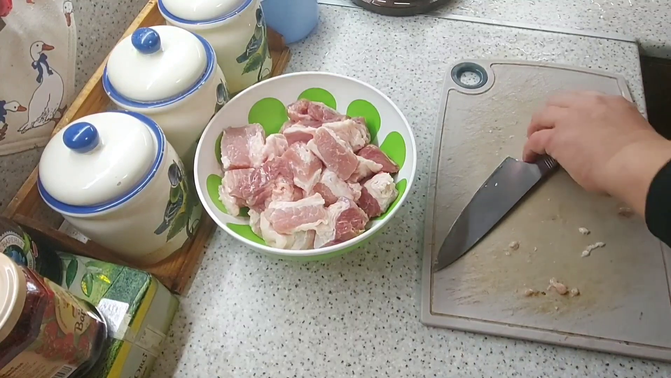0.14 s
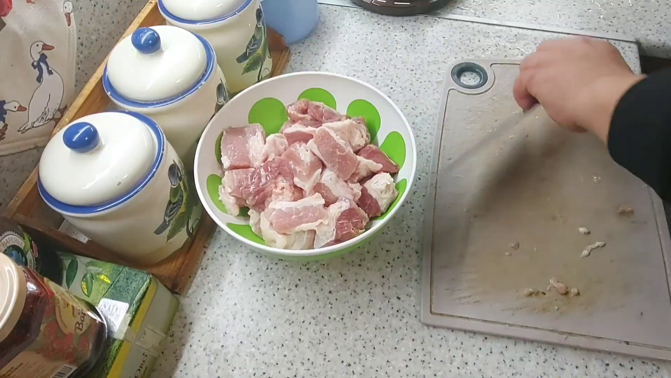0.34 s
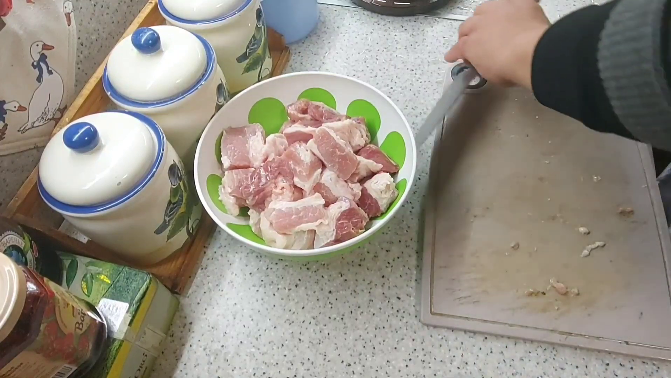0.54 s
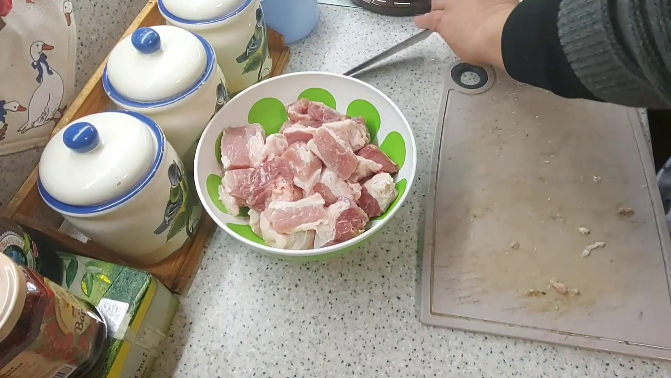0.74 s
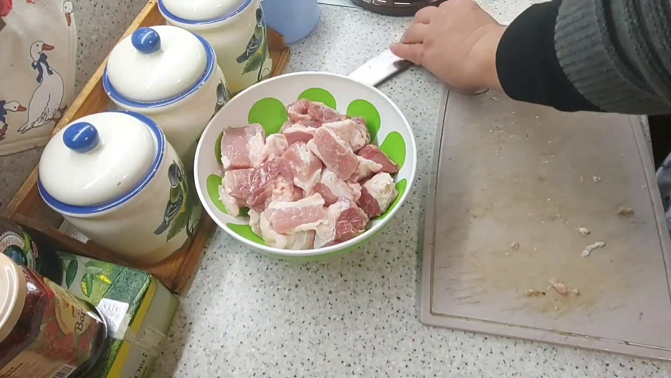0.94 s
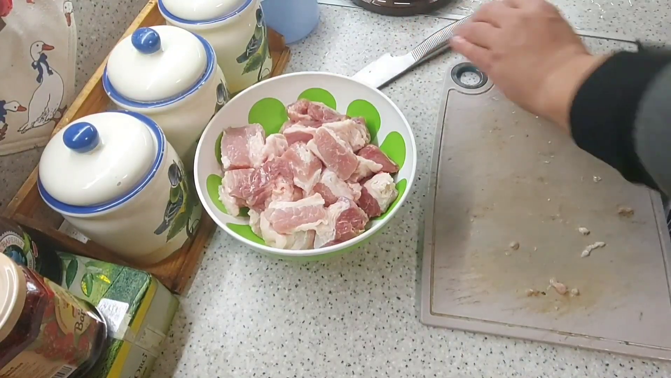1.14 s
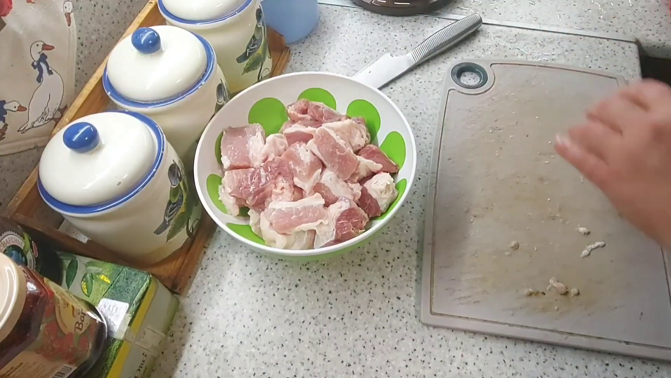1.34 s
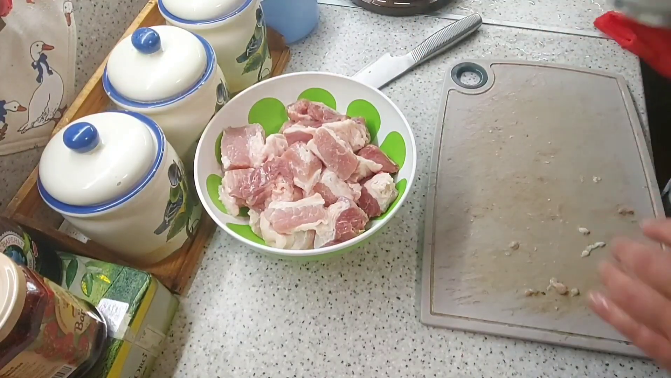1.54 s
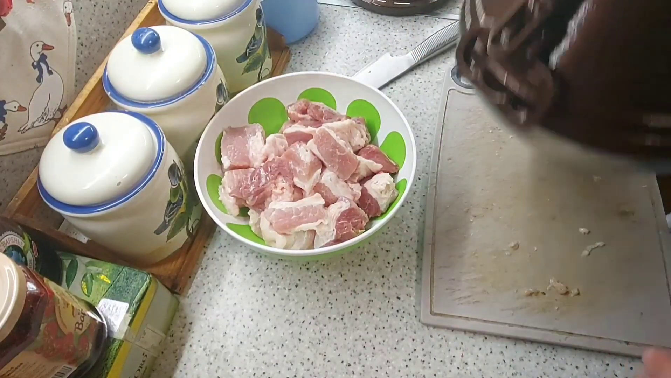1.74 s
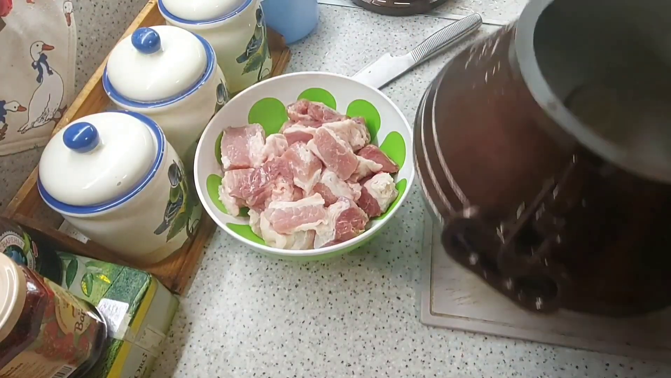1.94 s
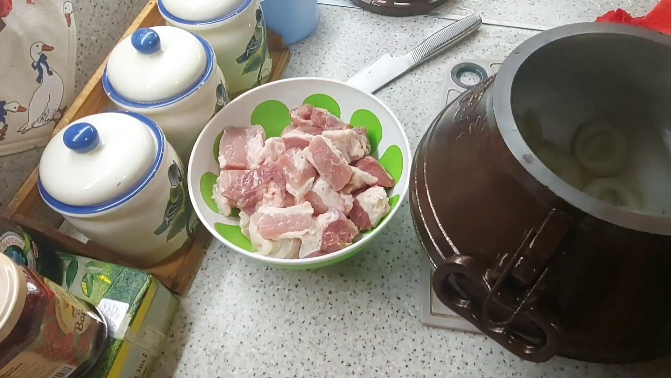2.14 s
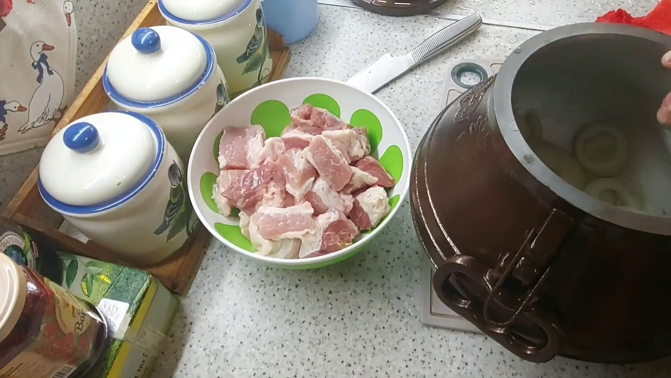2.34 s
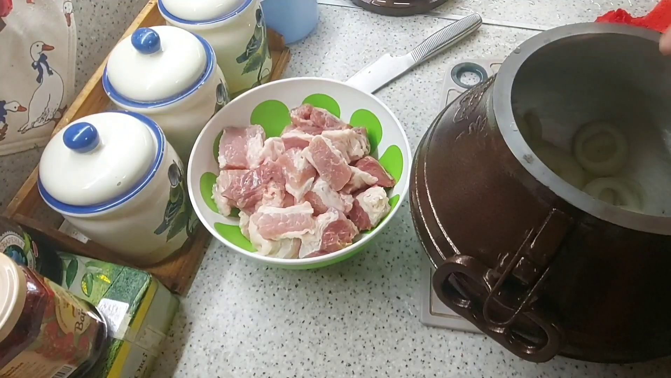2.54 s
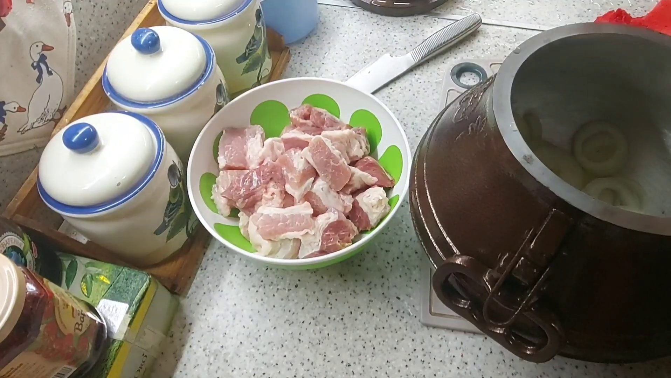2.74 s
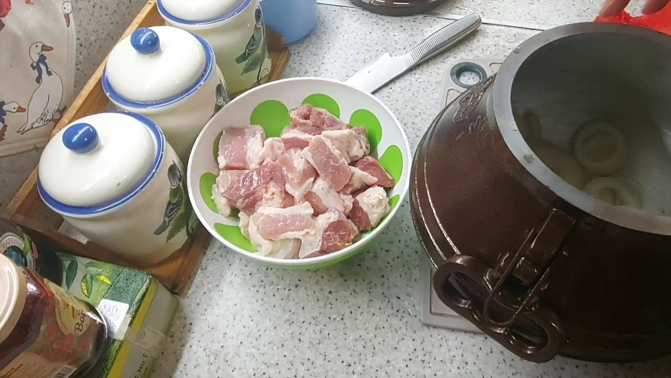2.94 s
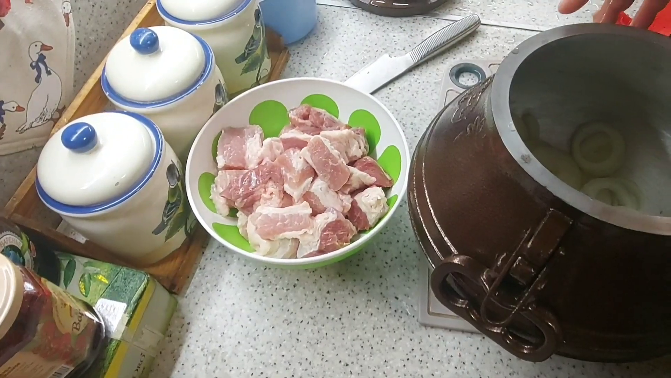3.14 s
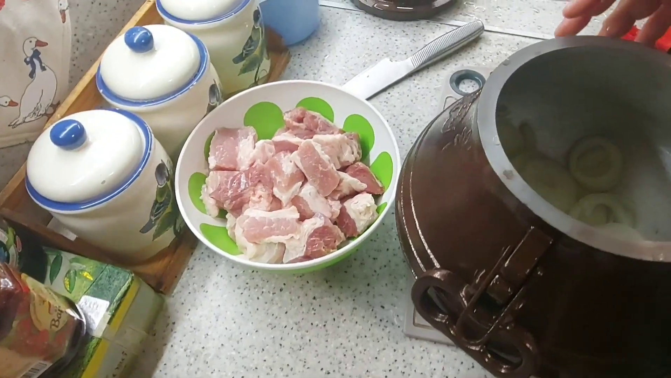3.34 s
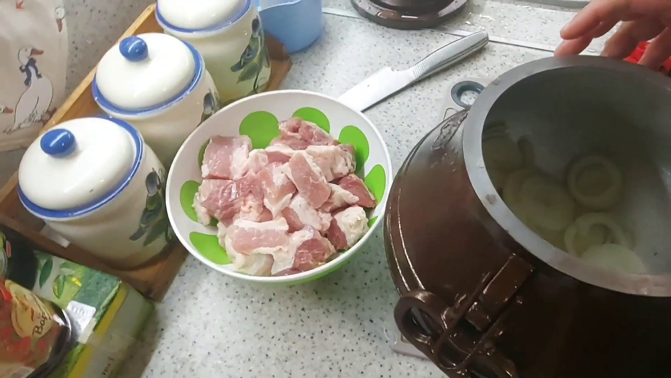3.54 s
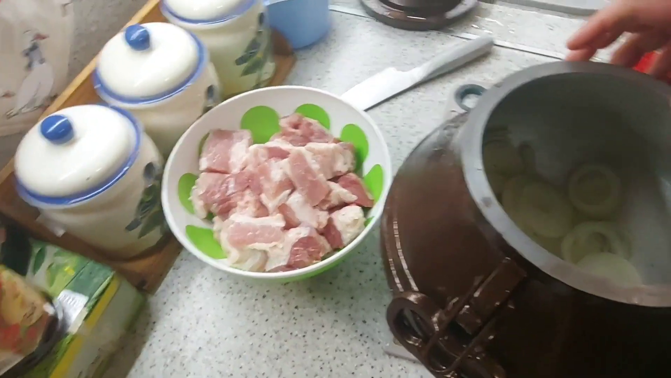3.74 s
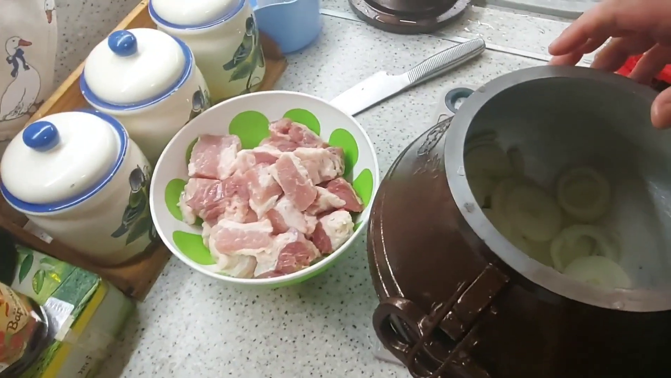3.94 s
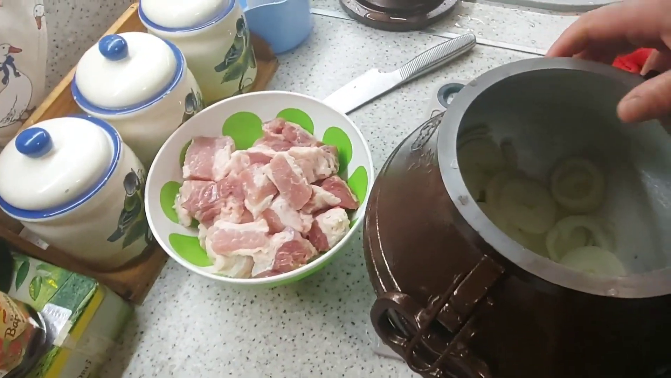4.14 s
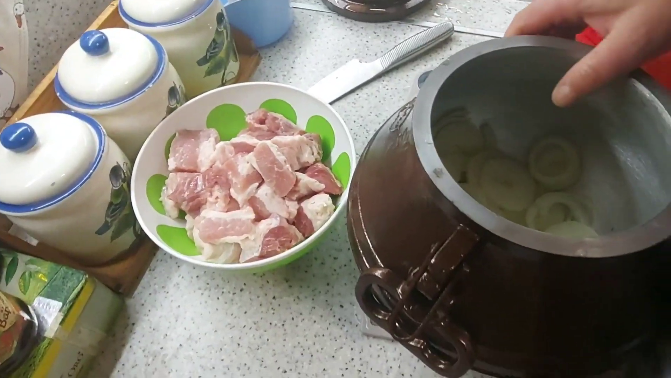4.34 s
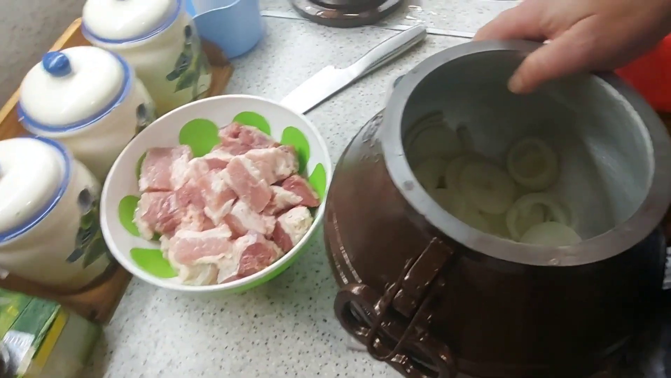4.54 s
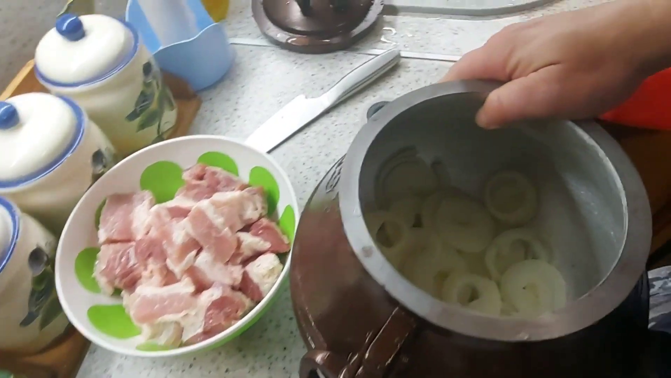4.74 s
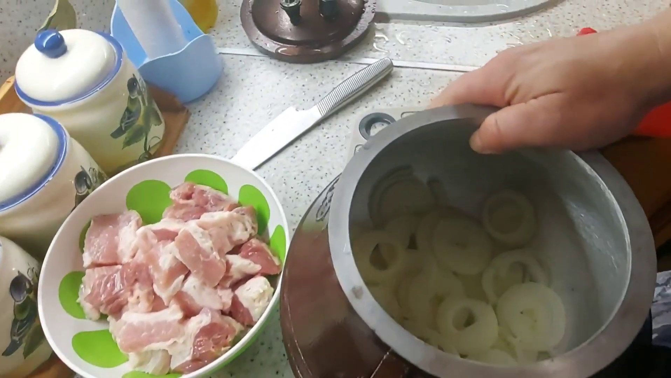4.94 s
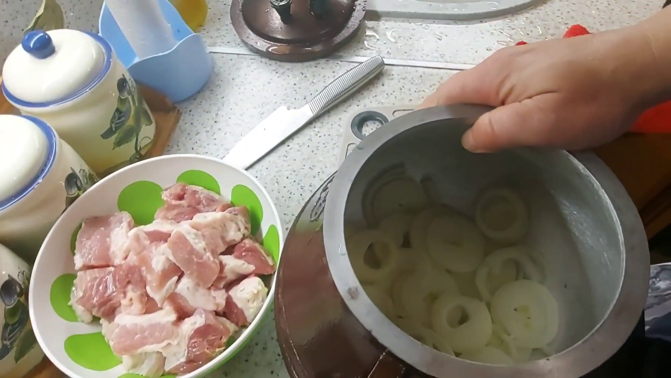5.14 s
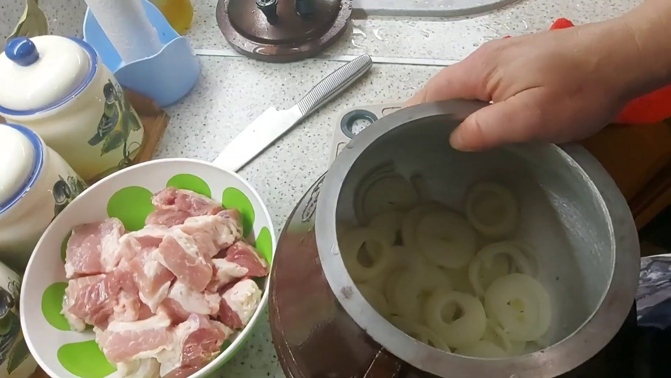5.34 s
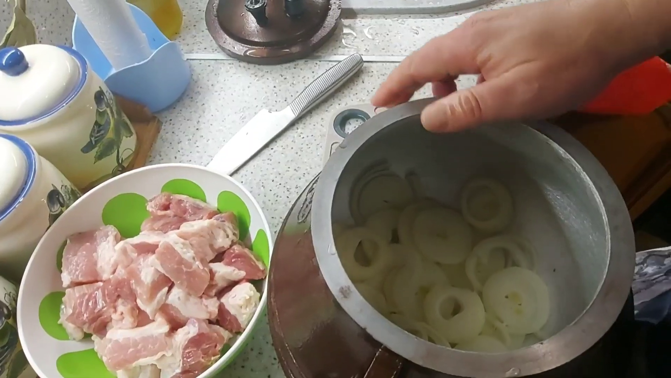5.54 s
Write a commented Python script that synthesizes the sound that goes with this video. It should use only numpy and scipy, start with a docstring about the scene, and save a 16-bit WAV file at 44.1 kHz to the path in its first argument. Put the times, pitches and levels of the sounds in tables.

```python
"""A steel kitchen knife is dragged off a plastic board and laid on the counter, where its hollow handle
rocks to rest. Each blow thuds in the surface and rings the steel; each slide is a stream of tiny slips.
A heavy cast pot thumps onto the board, then is tilted and turned: its foot knocks, its fittings clink.
A sleeve rustles and an appliance hums in the small, hard-walled kitchen."""
import sys
import numpy as np
from scipy import signal
from scipy.fft import rfft, irfft, next_fast_len
from scipy.io import wavfile
from scipy.ndimage import uniform_filter1d, map_coordinates

SR = 44100
rng = np.random.default_rng(int(sys.argv[2]) if len(sys.argv) > 2 else 0)


def put_to_file(sound):
    """Save the sound as 16-bit audio at rate SR, in the file named by the first command-line argument."""
    columns = np.atleast_2d(sound).T  # one column per channel
    safe = np.clip(columns, -1, 1)
    whole_steps = np.round(safe * 32767)
    wavfile.write(sys.argv[1], SR, whole_steps.astype(np.int16))


N = 250664
T = np.arange(N) / SR
TAIL = T[:SR // 3]  # time axis of one hit, in seconds
STEEL_DETUNE = .004  # range of pitch shift between points of contact, as a share

# Modes of the blade and the hollow handle. Each row: pitch in Hz, level in dB, t60 in seconds.
BLADE_MODES = [(861, -8, .45), (1007, 2, .13), (1075, -2, .1), (1540, 0, .14), (1663, -6, .2),
               (2207, -5, .25), (2530, -11, .3), (2660, -6, .55), (2860, -6, .15), (3155, -7, .18),
               (3736, -3, .15), (4409, -4, .16), (4807, -7, .24), (5308, -5, .17), (6374, -4, .17),
               (6800, -11, .38), (8376, -8, .25), (8990, -14, .25), (10150, -6, .25), (10430, -7, .25),
               (11255, -8, .5), (11650, -2, .2), (12030, -5, .27), (12610, -7, .27), (13200, -9, .3),
               (14410, -9, .25)]
HANDLE_MODES = [(3316, -12, .2), (3441, -8, .2), (4500, -14, .12), (4807, -3.5, .28), (5383, -10, .2),
                (5704, 3, .2), (5822, -3, .2), (5981, -4.5, .2), (6395, -11, .2), (6800, -12, .22),
                (7887, -12, .2), (8700, -4, .18), (9866, -4, .24), (10400, -9, .22), (11255, -5, .24),
                (11720, 0, .2), (12030, -5, .24), (12600, -7, .24), (14020, -12, .22), (15010, -7, .12)]
# Tone of steel grit, the board's thud and crack, and a dull rustle. Each row: frequency in Hz, gain in dB.
STEEL_GRIT_EQ = [(300, -14), (900, -6), (1600, -2.5), (3200, -0.5), (4100, -4), (5500, -2.5), (7600, -4),
                 (8800, -1.5), (9400, -1.5), (10200, -1.5), (12000, 4.5), (13500, -2), (16000, -10)]
BOARD_THUD_EQ = [(80, -7.5), (200, 2.5), (330, 11), (470, -2), (700, -5), (1000, -21), (1600, -16),
                 (3000, -16.5), (6000, -42)]
BOARD_CRACK_EQ = [(200, 20), (900, 11.5), (2000, 10), (3200, 4), (4250, 8), (5000, 3.5), (8000, -0.5),
                  (10500, 4), (13000, 2), (16000, -43)]
RUSTLE_EQ = [(60, -1), (140, 12.5), (260, 4.5), (500, 6), (800, -5), (1500, -10.5), (3000, -78)]


def knife():
    """The edge drags off the board, the tip lands and slides, the handle drops and rocks."""
    # Sliding strokes. Each row: start and length in seconds, body and rasp in dB, fade in dB per second.
    edge_drag = [(.497, 0.0087, -35.5, -39, 17.5), (.53, 0.059, -42, -43, 60)]
    tip_slide = [(.682, 0.015, -39, -39.5, -2.5), (.85, 0.087, -38.5, -41.5, 2),
                 (.875, .08, -32.5, -36.5, 110)]
    handle_roll = [(.98, 0.092, -23.5, -29.5, 60), (1.15, 0.085, -26.5, -40, 16),
                   (1.21, 0.235, -28.5, -39, 46)]
    rest_s = 1.465
    partials = overtones()
    out = knife_blows(partials)
    out += slide(edge_drag, board, BLADE_MODES, partials, body_db=1, steel_db=-1.8, grit_db=-5.5, rate=300)
    out += slide(tip_slide, counter, BLADE_MODES, partials,
                 body_db=2.6, steel_db=-1.5, grit_db=-2.5, rate=250)
    out += slide(handle_roll, hollow, HANDLE_MODES, partials,
                 body_db=-.79, steel_db=0, grit_db=.4, rate=480)
    return out * np.exp(-np.maximum(T - rest_s, 0) / .041)  # lying flat, the fingers still it


def knife_blows(partials):
    """Each blow thuds in the surface, cracks at the contact and rings the steel; hard ones also clack."""
    # The edge taps the board. Each row: start in seconds, ring level in dB.
    taps = [(.423, -38.5), (0.497, -31.5), (.502, -33), (0.5092, -35), (0.5294, -29), (.538, -36),
            (0.5518, -34.5), (.559, -37.5), (0.5728, -38.5), (.581, -43), (0.599, -41)]
    # Hits on the counter. Each row: start in seconds, thud in dB, steel in dB, hardness from 0 to 1.
    hits = [(0.6987, -22.5, -28.5, 0.8), (0.706, -30, -32.5, 0), (0.7942, -19.5, -27, 0.08),
            (.822, -23.5, -34.5, 0.23), (.854, -29, -34, 0.4), (0.87, -24.5, -37, 0.4),
            (.889, -25.5, -31, 0), (0.9673, -11, -32.5, 0.68), (0.975, -20, -41, .4),
            (.986, -20.5, -27.5, .5), (0.9936, -14.5, -20, 0.6), (1.005, -24.5, -22, .7),
            (1.0486, -10.5, -30, 0.6), (1.057, -19, -22, 0.2), (1.065, -23, -32.5, 0),
            (1.089, -22, -38.5, 0), (1.102, -18.5, -48, 0), (1.117, -23.5, -39.5, 0.05),
            (1.126, -23, -58, 0.2), (1.164, -26, -40, 0.2)]
    # The handle rocks unevenly to rest. Each row: start in seconds, thud in dB, steel in dB.
    rocks = [(1.189, -43, -32), (1.2103, -25, -18.5), (1.22, -43, -27), (1.252, -33, -20.5),
             (1.272, -25, -32), (1.292, -23.5, -29), (1.323, -46, -30), (1.369, -30, -35.5),
             (1.41, -40, -39), (1.443, -41.5, -46)]
    # The handle drops and clangs. Each row: start in seconds, level in dB.
    clangs = [(0.9939, -21), (1.006, -20.5)]
    contact = lambda: blow(glint(t60=.033) + amp(.5) * bend(shimmer(partials))) * onset(.0021)
    blade = lambda: ring(BLADE_MODES, scatter_db=3.7, width=1.3, detune=STEEL_DETUNE)
    handle = lambda: bend(ring(HANDLE_MODES, scatter_db=3.2, width=.83, detune=STEEL_DETUNE))
    out = np.zeros((2, N))
    for s, db in taps:
        add(out, s, amp(db) * (blade() + amp(2.5) * glint(t60=.034) + amp(-8) * hollow()))
    for s, thud_db, steel_db, hardness in hits:
        add(out, s, amp(thud_db) * (counter() + hardness * clack()))
        add(out, s, amp(steel_db) * (contact() + amp(-7) * blade()))
    for s, thud_db, steel_db in rocks:
        add(out, s, amp(thud_db) * hollow() + amp(steel_db) * (contact() + amp(-9) * handle()))
    for s, db in clangs:
        add(out, s, amp(db) * handle())
    return out


def slide(strokes, body, modes, partials, body_db, steel_db, grit_db, rate, contacts=4):
    """Sliding steel slips about `rate` times a second, shaking the surface, ringing and rasping."""
    attack_s, release_t60, damping_t60 = .0027, .22, .21
    press = rasp = 0
    for s, length, press_db, rasp_db, fade_db_per_s in strokes:
        fade = amp(-fade_db_per_s * np.clip(T - s, 0, length))
        effort = gate(s, length, attack_s, release_t60) * fade
        press += amp(press_db) * effort
        rasp += amp(rasp_db) * effort
    start_s, end_s = strokes[0][0], s + length + release_t60
    span = slice(int(start_s * SR), int(end_s * SR))
    out = np.zeros((2, N))
    for _ in range(contacts):  # each point of contact chatters in clusters, with its own ring
        chatter = slips(rate / contacts, scatter_db=3.7) * amp(1.5 * walk(90))
        force = unit(chatter[:, span]) / np.sqrt(contacts)
        steel = ring(modes, scatter_db=3.6, width=1.6, detune=STEEL_DETUNE) + amp(5) * shimmer(partials)
        steel = bend(steel) * decay(damping_t60)  # pressing on the surface shortens the ring
        layers = (body(), press, body_db), (steel, rasp, steel_db), (glint(t60=.01), rasp, grit_db)
        for response, drive, db in layers:
            sound = signal.fftconvolve(force * drive[span], unit_energy(response), axes=-1)
            add(out, start_s, amp(db) * sound)
    return out


def squeak(stop_s=.966, roughness=.0024, flicker_db=4):
    """The sliding tip bows the blade: a few partials swell, and the lowest holds until the stroke ends."""
    # Bowed partials. Each row: start in seconds, pitch in Hz, level in dB, fade in dB per second.
    tones = [(.896, 1400, -38, .5), (.88, 1663, -34, 100), (.885, 2300, -44.5, 50), (0.8, 2681, -41, 64)]
    out = 0
    for s, hz, db, fade_db_per_s in tones:
        level = amp(db - fade_db_per_s * np.clip(T - s, 0, 1) + flicker_db * walk(120))
        pitch = hz * (1 + roughness * walk(300))
        tone = np.sin(2 * np.pi * np.cumsum(pitch) / SR)
        out += level * gate(s, stop_s - s, attack=.018, t60=.051) * tone
    return out


def overtones(count=130, t60=.11):
    """The steel's many close, high partials, each in stereo and weaker in the blade's dull bands."""
    hz = rng.uniform(1800, 15900, (count, 1, 1))
    phase = rng.uniform(0, 2 * np.pi, (count, 2, 1))
    level = amp(np.interp(hz, *np.transpose(STEEL_GRIT_EQ)))
    return level * np.sin(2 * np.pi * hz * TAIL + phase) * decay(t60)


def shimmer(partials):
    """Each point of contact wakes the close partials in its own proportions."""
    return blow(np.tensordot(uneven(len(partials), scatter_db=4), partials, 1))


def bend(x, depth=.0022, rate_hz=9):
    """The steel's resonances glide up and down as the point of contact moves."""
    speed = 1 + depth * np.sin(2 * np.pi * (rate_hz * TAIL + rng.random()))
    position = np.cumsum(speed) - speed[0]
    return np.array([map_coordinates(side, [position]) for side in x])


def glint(t60, patchy_db=7, bands=60):
    """A bright steel crack; each point of contact favours its own bands."""
    band_hz = np.linspace(1000, 16000, bands)
    band_db = patchy_db * np.clip(rng.standard_normal(bands), -2, 1)
    return blow(colour(crack(STEEL_GRIT_EQ, t60), np.transpose([band_hz, band_db])))


def clack():
    """Steel bites into the counter: one sharp pulse and a brief scatter."""
    # A hard midrange tone. Each row: frequency in Hz, gain in dB.
    clack_eq = [(250, -8), (600, 3.5), (900, 3.5), (1300, 0), (1800, -7.5), (2250, -7.5), (3000, -25),
                (16000, -39.5)]
    scatter = amp(-19) * decay(.029) * noise(len(TAIL), likeness=.69)
    return blow(colour((TAIL == 0) + scatter, clack_eq))


def counter():
    """The counter answers a blow with a few modes in a dense thud."""
    # The counter's modes. Each row: pitch in Hz, level in dB, t60 in seconds.
    modes = [(80, -14, .4), (195, -8, .08), (237, -3, .17), (360, -5, .1), (385, -1, .12), (471, 1, .14),
             (508, 0, .12), (578, -9, .06), (625, -11, .06), (750, -10, .06), (851, 3, .14), (915, -2, .11),
             (964, -3, .11), (1090, -8, .05), (1270, -7, .06), (1400, -8, .05), (1600, -14, .04)]
    # Its dull thud. Each row: frequency in Hz, gain in dB.
    thud_eq = [(50, -14), (85, -1.5), (140, -7), (230, 5), (300, -8.5), (380, 1), (520, -0.5), (700, -15),
               (860, -3.5), (1100, -14), (1350, -22), (2000, -17.5), (3200, -20.5), (6000, -50.5)]
    tone = ring(modes, scatter_db=7.9, width=.83, detune=.014)
    return blow(tone + amp(-2.5) * crack(thud_eq, t60=.054, likeness=.95))


def hollow():
    """A darker counter thud, under the rolling handle and the edge's light taps."""
    return blow(colour(counter(), [(90, -11.5), (230, 2.5), (480, 1), (850, -5.5), (1400, -8)]))


def board():
    """The plastic board thuds under the dragging edge."""
    thud = crack(BOARD_THUD_EQ, t60=.16, likeness=.81)
    return colour(thud, [(120, 1), (235, 4), (340, -14), (1000, 7)])


def pot_landing():
    """The pot's weight rings the board low: two thumps and a faint third."""
    # Modes of the laden board. Each row: pitch in Hz, level in dB, t60 in seconds.
    modes = [(82.7, 2, 0.22), (93, -5.5, 0.1), (179.5, -6.5, 0.14), (235, -4.5, 0.12), (275, -11, 0.11),
             (367, -3.5, 0.082), (653, -15, 0.11), (844, -12, 0.067)]
    # Thumps. Each row: start in seconds, level in dB, low-pass corner in Hz.
    thumps = [(2.02, -17, 1100), (2.148, -19, 292), (2.255, -48, 200)]
    out = np.zeros((2, N))
    for s, db, corner_hz in thumps:
        thump = ring(modes, scatter_db=1, width=1) * onset(.0037)
        add(out, s, amp(db) * blow(lowpass(thump, corner_hz)))
    return out


def pot_knocks():
    """The pot's foot knocks as it shifts; grit snaps under it and the board thuds."""
    # The foot's modes. Each row: pitch in Hz, level in dB, t60 in seconds.
    modes = [(96, -13.5, .17), (361, -7, 0.17), (444, -1, 0.069), (475, 4.5, 0.049), (533, 0.5, 0.042),
             (826, -5.5, 0.054), (930, 3, 0.028), (1700, -14, 0.011), (3160, 6, .03)]
    # The pot's thud. Each row: frequency in Hz, gain in dB.
    thud_eq = [(80, -20), (160, -6), (260, -4), (440, 0), (650, 0), (900, -2.5), (1100, -13.5), (1450, -16),
               (3000, -12), (6000, -25)]
    # Each row: start in seconds, knock in dB, its low-pass corner in Hz, snap in dB, board in dB.
    knocks = [(1.989, -52, 696, -34, -42), (2.022, -32, 1400, -53, -45), (2.798, -62, 900, -43.5, -60),
              (2.824, -38.5, 1280, -40, -40.5), (3.255, -53, 1200, -38.5, -54),
              (3.545, -21, 1400, -26, -46), (3.552, -31, 2500, -25, -50), (3.561, -31, 2000, -42, -48),
              (3.586, -38.5, 900, -55, -47), (3.670, -29, 1500, -34, -33), (5.022, -36, 700, -44, -32.5)]
    out = np.zeros((2, N))
    for s, knock_db, corner_hz, snap_db, body_db in knocks:
        foot = ring(modes, scatter_db=1.5, width=.9, detune=.05)
        thud = crack(thud_eq, t60=.034, likeness=1)
        knock = blow(lowpass(foot + amp(-3) * thud, corner_hz, order=3))
        snap = crack(BOARD_CRACK_EQ, t60=.043) * onset(.00047)
        body = blow(lowpass(crack(BOARD_THUD_EQ, t60=.096, likeness=.88), 520))
        add(out, s, amp(knock_db) * knock + amp(snap_db) * snap + amp(body_db) * body)
    return out


def pot_ticks():
    """Tiny, dry, bright ticks as the pot moves."""
    # Each row: start in seconds, level in dB.
    ticks = [(1.987, -44), (2.822, -32.5), (3.235, -46.5), (3.552, -20.5), (4.084, -61), (5.022, -40.5),
             (5.47, -52), (5.48, -35.5)]
    tick_eq = [(1000, -3), (4000, -3.5), (7500, 7), (12000, 9), (16000, 5.5)]
    out = np.zeros((2, N))
    for s, db in ticks:
        add(out, s, amp(db) * crack(tick_eq, t60=.036))
    return out


def pot_clinks():
    """The pot's metal fittings clink, each time favouring a different band."""
    # The fittings' modes. Each row: pitch in Hz, level in dB, t60 in seconds.
    modes = [(1410, -12, .1), (1730, -12, .035), (1957, -12, .25), (2038, -13, .1), (2140, -7, .05),
             (2630, -4, .04), (2993, -7, .09), (3160, -3, .05), (3725, 0, .05), (3919, -3, .06),
             (4188, 0, .08), (4651, -7, .07), (5017, 0, .07), (5507, -2, .07), (5950, 4, .06),
             (6420, -2, .09), (6800, -8, .05), (7634, -8, .07), (8420, -5, .06), (9415, -4, .055)]
    # Their gritty contact. Each row: frequency in Hz, gain in dB.
    grit_eq = [(500, 9), (850, 15.5), (1300, 7), (2000, 19), (2700, -16), (4000, 14), (5800, 5.5),
               (7500, 0), (12000, -8)]
    # Each row: start in seconds, level in dB, centre in Hz, fall below it in dB per octave (double above).
    clinks = [(1.989, -39.5, 2990, 21), (2.067, -46.5, 2020, 10), (2.10, -48, 3000, 26),
              (4.185, -53.5, 2930, 16), (4.216, -38, 5640, 1), (4.382, -39, 2110, 9.5),
              (4.397, -46, 2390, 8), (4.4045, -31, 4700, 1), (4.408, -32.5, 5770, 6),
              (4.563, -45, 1970, 6.5), (4.767, -46, 3100, 10.5), (5.405, -59, 5020, 3.5)]
    out = np.zeros((2, N))
    for s, db, centre_hz, fall_db in clinks:
        clink = ring(modes, scatter_db=2.3, width=.87, detune=.0018) + amp(.5) * crack(grit_eq, t60=.059)
        focus_eq = [(centre_hz / 4, -2 * fall_db), (centre_hz, 0), (centre_hz * 4, -4 * fall_db)]
        add(out, s, amp(db) * blow(colour(clink * onset(.0002), focus_eq)))
    return out


def grinding():
    """Grit crackles under the pot's foot as it starts to move."""
    # Each row: start in seconds, length in seconds, level in dB.
    grinds = [(3.176, 0.018, -54), (3.518, .014, -45.5), (3.533, 0.017, -32), (3.654, 0.021, -46.5)]
    push = movements(grinds, attack=.0075, t60=.053)
    crackle = signal.fftconvolve(slips(1500, scatter_db=5), crack(BOARD_CRACK_EQ, t60=.0031), axes=-1)
    return push * unit(crackle[:, :N])


def nudges():
    """A soft palm moves only the low notes of the board under the pot."""
    # Each row: start in seconds, level in dB.
    bumps = [(3.26, -45.5), (4.122, -47), (4.725, -41.5), (5.135, -49), (5.351, -47.5), (5.414, -53),
             (5.5, -44.5)]
    out = np.zeros((2, N))
    for s, db in bumps:
        bump = crack(RUSTLE_EQ, t60=.083, likeness=.4) * onset(.0067)
        add(out, s, amp(db) * blow(lowpass(bump, 300)))
    return out


def pot_rattle(start_s=2.215, stop_s=2.78, rate_hz=23.1):
    """A faint, quick rattle lingers while the pot settles."""
    rattle_eq = [(1500, -17), (2150, 6), (2550, 3), (3300, -17), (11000, -8.5)]
    cycle = (T - start_s) * rate_hz % 1
    beats = np.exp(-3 * cycle) * (T > start_s) * (T < stop_s)
    return amp(-61) * beats * wash(rattle_eq, likeness=.25)


def rubbing():
    """The pot drags with a dull rustle, sleeve and skin brush with a hiss; both trail the landing."""
    # Pot drags and sleeve brushes. Each row: start in seconds, length in seconds, level in dB.
    drags = [(2.78, 0.037, -35), (3.13, 0.13, -52.5), (3.235, 0.5, -51), (3.5, 0.37, -57),
             (4.11, 0.41, -54.5), (4.54, 0.16, -53), (4.68, 0.32, -53.5), (5.0, 1, -90.5)]
    brushes = [(-.05, 0.068, -55), (0.115, 0.07, -56), (1.657, 0.32, -69.5), (2.351, 0.3, -69),
               (2.585, 0.12, -55), (2.674, 0.54, -63.5)]
    # The hiss of rubbing and the hiss after the landing. Each row: frequency in Hz, gain in dB.
    hiss_eq = [(500, -12), (1200, -1), (2200, -1.5), (4000, -2.5), (7000, -7.5), (11000, -4), (16000, -10)]
    settle_eq = [(500, -17), (1200, 4.5), (2200, 5.5), (4000, -0.5), (7000, -6), (11000, -6),
                 (16000, -11.5)]
    drag, brush = (movements(rows, attack=.082, t60=.2) for rows in (drags, brushes))
    settle = gate(start=1.99, length=0, attack=.0097, t60=.93)
    rustle_level = drag + amp(-3.5) * brush + amp(-38.5) * settle
    hiss_level = brush + amp(-8) * drag
    rustle = wash(RUSTLE_EQ, likeness=.17) * amp(2 * walk(27))
    hiss = wash(hiss_eq, likeness=.0062) * amp(1.77 * walk(75))
    return rustle_level * rustle + hiss_level * hiss + amp(-42) * settle * wash(settle_eq, likeness=0)


def appliance_hum(motor_hz=48.6):
    """An appliance motor hums over faint room air; its upper tones waver, dip and swell."""
    # Room air. Each row: frequency in Hz, gain in dB.
    air_eq = [(25, -3.5), (50, -6), (80, -1.5), (130, -13.5), (250, -8), (380, -8.5), (630, -20),
              (1000, -29.5), (2000, -25.5), (3200, -36), (6000, -33), (11000, -30), (16000, -34)]
    # Upper tones. Each row: pitch in Hz, level in dB relative to the swell.
    tones = [(147.3, -11), (294.6, -5.5), (343.7, 6.5), (431, -19.5)]
    # Their swell. Each row: time in seconds, level in dB.
    swell = [(0, -66), (1.8, -72), (2.5, -67), (3.0, -64), (5.68, -61.5)]
    swell_db = np.interp(T, *np.transpose(swell))
    out = amp(-61.5) * wash(air_eq, likeness=.067)
    out += np.sqrt(2) * amp(-56.5 + .71 * walk(3.8)) * np.sin(2 * np.pi * motor_hz * T)
    for hz, db in tones:
        level = np.sqrt(2) * amp(db + swell_db + .45 * walk(2))
        out += level * np.sin(2 * np.pi * hz * T + .11 * walk(5.1))
    return out


def kitchen(x, early_t60=.026, early_db=-3.5, tail_t60=.21, tail_db=-9.5):
    """Crockery and a wall close by scatter the sound at once; the room adds a short tail."""
    # The reflections are thin in the bass. Each row: frequency in Hz, gain in dB.
    room_eq = [(60, -29.5), (250, -22.5), (500, -7), (1000, 0.5), (5000, 2), (16000, -5)]
    out = x
    for t60, db, delay_s in ((early_t60, early_db, .001), (tail_t60, tail_db, .007)):
        echoes = noise(len(TAIL), likeness=.25) * decay(t60) * (TAIL > delay_s)
        response = colour(unit_energy(echoes), room_eq)
        out = out + amp(db) * signal.fftconvolve(x, response, axes=-1)[:, :N]
    return out


def ring(modes, scatter_db, width, detune=0):
    """Damped modes; each blow weights and shifts them anew, with a separate phase left and right."""
    out = 0
    for k, (hz, db, t60) in enumerate(modes):
        weight, shift = rng.uniform(-.5, .5, 2)
        phase = width * min(hz / 700, 2) * rng.standard_normal((2, 1))  # long waves reach both sides alike
        polarity = (-1) ** (k // 3)
        tone = np.sin(2 * np.pi * hz * (1 + detune * shift) * TAIL + phase)
        out += polarity * amp(db + scatter_db * weight) * decay(t60) * tone
    return blow(out)


def crack(eq, t60, likeness=.076):
    """The dense, quickly dying part of a contact."""
    return blow(colour(noise(len(TAIL), likeness) * decay(t60), eq))


def slips(rate, scatter_db):
    """Stick and slip: tiny impacts of uneven size, about `rate` a second."""
    return (uneven(N, scatter_db) * (rng.random(N) < rate / SR))[None]


def uneven(count, scatter_db):
    """Gains of random size and sign."""
    return amp(scatter_db * np.clip(rng.standard_normal(count), -2, 2)) * rng.choice([-1, 1], count)


def wash(eq, likeness):
    """Steady coloured noise at rms 1."""
    return unit(colour(noise(N, likeness), eq))


def noise(count, likeness):
    """Stereo white noise, from wide (likeness 0) to mono (1)."""
    white = rng.standard_normal((3, count))
    return np.sqrt(likeness) * white[0] + np.sqrt(1 - likeness) * white[1:]


def walk(rate):
    """A random drift at rms 1 that turns `rate` times a second."""
    hold = int(SR / rate)
    steps = np.repeat(rng.standard_normal(N // hold + 1), hold)
    return unit(uniform_filter1d(steps, hold)[:N])


def colour(x, eq):
    """Shape by (Hz, dB) points, with minimum phase so that attacks stay sharp."""
    size = 2 * next_fast_len(x.shape[-1])
    hz, db = np.transpose(eq)
    bin_hz = np.arange(size // 2 + 1) * SR / size
    log_gain = np.log(amp(np.interp(np.log(bin_hz + 1), np.log(hz), db)))
    cepstrum = irfft(log_gain)[:size // 2]
    cepstrum[1:] *= 2
    return irfft(rfft(x, size) * np.exp(rfft(cepstrum, size)))[..., :x.shape[-1]]


def lowpass(x, hz, order=2):
    """Soft contacts lose their treble."""
    return signal.sosfilt(signal.butter(order, hz, fs=SR, output="sos"), x)


def movements(rows, attack, t60):
    """The summed envelope of several movements."""
    return sum(amp(db) * gate(s, length, attack, t60) for s, length, db in rows)


def gate(start, length, attack, t60):
    """Attack, hold and release of one movement, in seconds."""
    release = amp(-60 * np.clip(T - start - length, 0, 2 * t60) / t60)
    return np.clip((T - start) / attack, 0, 1) * release


def onset(rise_s):
    """A contact builds up over a short time."""
    return 1 - np.exp(-TAIL / rise_s)


def decay(t60):
    """A hit dies by 60 dB in t60 seconds."""
    return amp(-60 * TAIL / t60)


def amp(db):
    """Decibels to gain."""
    return 10 ** (np.asarray(db) / 20)


def unit(x):
    """Scale to rms 1."""
    return x / np.sqrt(np.mean(x ** 2))


def unit_energy(x):
    """Scale a stereo response to a mean energy of 1 a side."""
    return x / np.sqrt(np.sum(x ** 2) / 2)


def blow(x):
    """Scale so that the loudest 5 ms have rms 1."""
    return x / np.sqrt(uniform_filter1d(np.mean(x ** 2, axis=0), size=220).max())


def add(out, s, sound):
    """Mix a sound in at s seconds."""
    start = int(s * SR)
    out[:, start:start + sound.shape[1]] += sound[:, :N - start]


def scene():
    """Knife and pot sound in the room over rustle and hum, all a little to the left."""
    blade = knife() + squeak()
    pot = pot_landing() + pot_knocks() + pot_ticks() + pot_clinks() + grinding() + nudges()
    mix = amp(-.28) * kitchen(blade + pot) + pot_rattle() + rubbing() + appliance_hum()
    return mix * amp([[.5], [-.5]])


def record(dry, bass_hz=40, top_hz=16200):
    """The deepest bass and the very top are cut away."""
    dry = signal.sosfilt(signal.butter(4, bass_hz, "high", fs=SR, output="sos"), dry)
    return signal.sosfilt(signal.ellip(10, .2, 80, top_hz, fs=SR, output="sos"), dry)


dry = scene()
out = record(dry)
put_to_file(out)
```